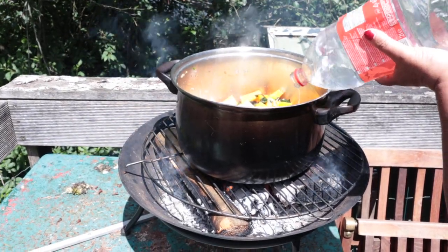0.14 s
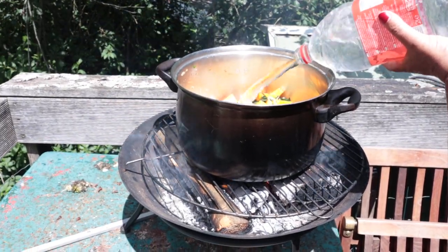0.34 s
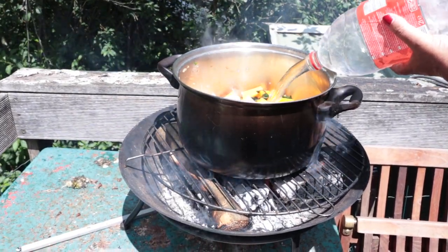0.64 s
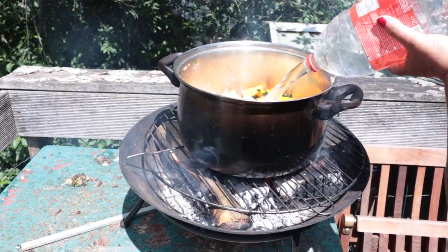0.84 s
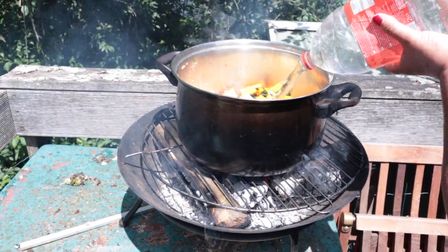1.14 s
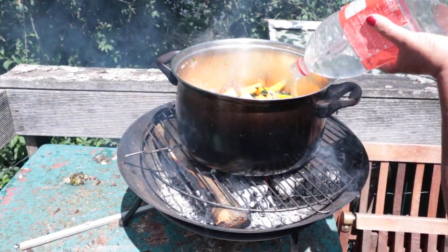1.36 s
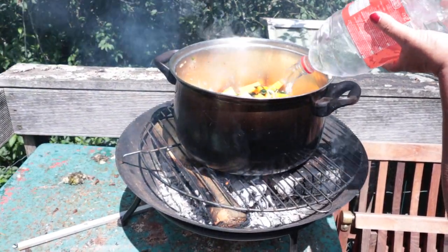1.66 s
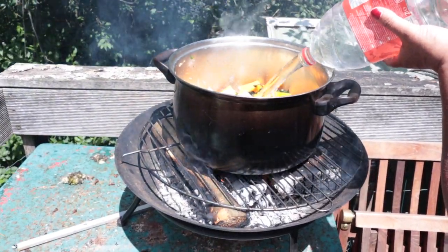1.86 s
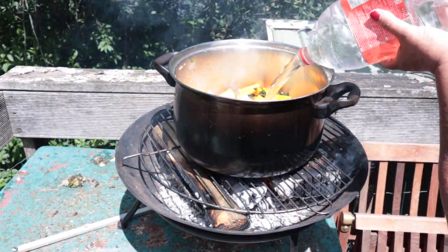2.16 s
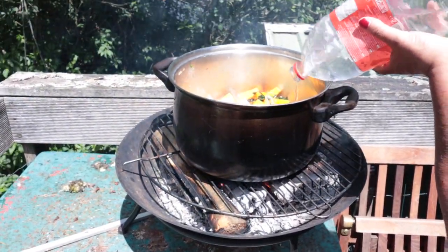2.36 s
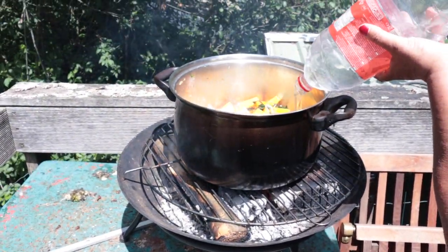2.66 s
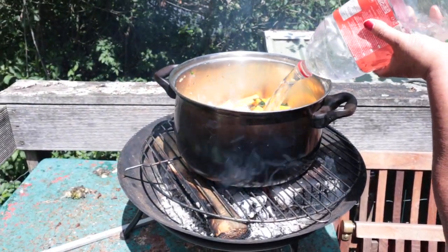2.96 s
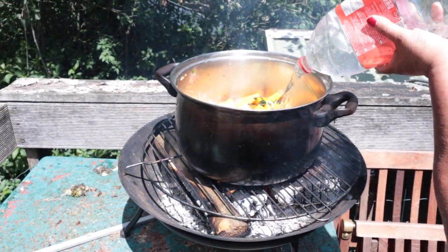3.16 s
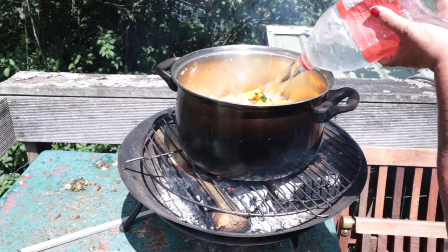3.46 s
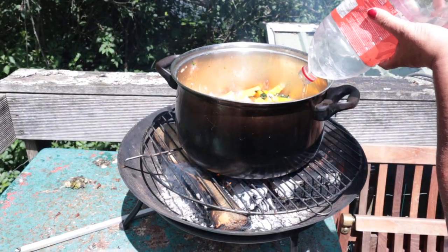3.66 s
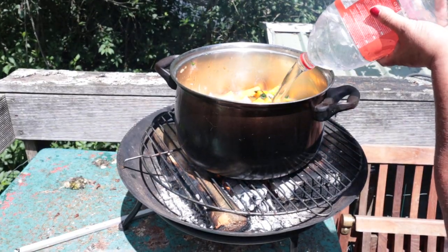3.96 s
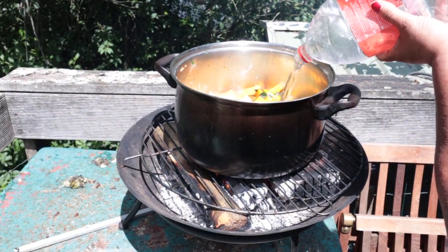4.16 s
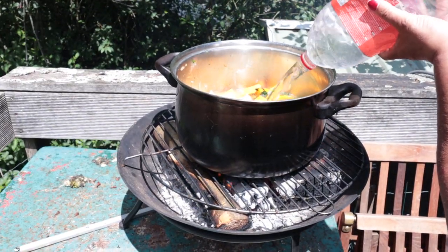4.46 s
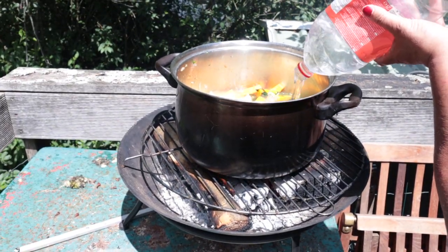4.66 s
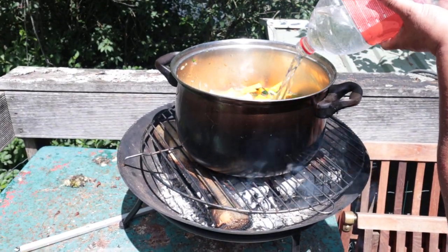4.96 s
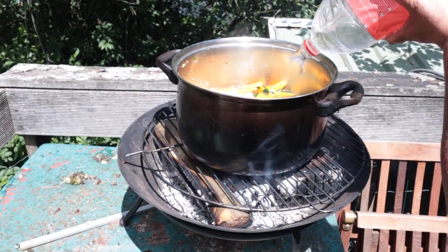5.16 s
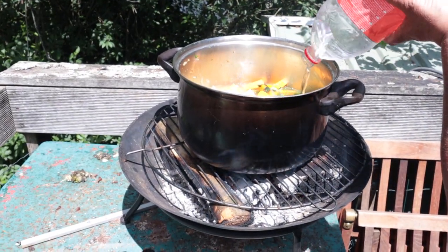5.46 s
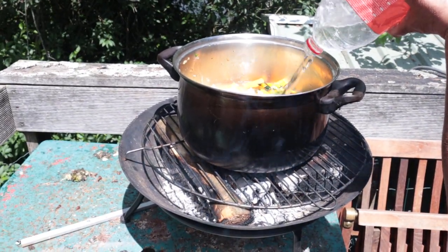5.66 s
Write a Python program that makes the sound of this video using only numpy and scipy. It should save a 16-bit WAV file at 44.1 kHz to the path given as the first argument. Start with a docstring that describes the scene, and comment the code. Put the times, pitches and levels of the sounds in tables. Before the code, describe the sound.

A stereo microphone near a pot on a terrace catches fierce frying hiss with sharp fat spits as water lands. Within about three seconds the hiss thins into separate fizzing bubbles, splashes and bright drips. The bottle, slightly to the right, gulps air with round low plops and snaps its thin walls in and out. A faint breeze rumbles, with a few soft gust thuds past the middle.

```python
"""Fat sizzles fiercely in a hot metal pot as water is poured in from a thin plastic bottle, gulping air.
The sizzle is noise cut into random bubble bursts and coloured by the pot; as the pot is quenched it thins to
a splashing trickle of ringing bubbles. The gulps are sinking rings with thumps, the pops of the bottle's walls
add snaps and clatter, spits are fading noise cracks and drips are rising tones.
A light breeze and gusts on the microphone are low, lumpy noise with single eddies."""
import sys
import numpy as np
from scipy import signal
from scipy.fft import rfft, irfft, next_fast_len
from scipy.io import wavfile

SR = 44100
rng = np.random.default_rng(int(sys.argv[2]) if len(sys.argv) > 2 else 0)


def materialize(psi):
    """Save the field psi as 16-bit PCM at rate SR to the path in sys.argv[1].

    A 1-D psi becomes a single channel; in a 2-D psi each row is a channel.
    """
    bounded = np.clip(np.atleast_2d(psi).T, -1, 1)
    quanta = np.round(bounded * 32767).astype(np.int16)
    wavfile.write(sys.argv[1], SR, quanta)


N = 256220

# the jet swells and thins as the bottle empties: (time [s], flow [dB], extra fine spray [dB])
JET = [(0.0, -6, 10), (0.18, 1.0, -1), (0.46, -1.5, 0), (0.72, -3.5, -2), (0.87, 0.5, 4.5),
       (1.14, -0.5, -1), (1.26, 2.5, 4), (1.68, -5, 2), (2.16, 4, -1), (2.36, 2, -3), (2.48, 3.5, -0.5),
       (2.6, -4, 1), (2.77, 0, -4.5), (3.0, 7, -1.5), (3.08, 6.5, -6.5), (3.19, 8, -4), (3.26, -4.5, 3),
       (3.38, -4.5, -2.5), (3.55, -7.5, -4), (3.72, 1, 2), (3.86, 0.5, 2.5), (4.14, -5, 5), (4.32, 2, 1),
       (4.47, -3, -5), (4.8, 2.5, 2), (5.2, 4, -1.5), (5.34, -1.5, -4), (5.52, 5.5, 0), (5.68, -5, 0),
       (5.81, 5.5, -2)]
# the jet moves between hot metal and food: (time [s], rise of the sizzle's upper half, fall of its lower half [dB])
# one value serves both
BRIGHTNESS = [(0, -1.5), (.55, 1.5), (.95, -0.5), (1.15, 2), (1.32, 3), (1.6, -1.5), (1.9, 0.5), (2.15, 4),
              (2.5, -0.1), (3.3, 2.5), (4.4, -1.5), (5.0, -3), (5.8, -3)]
# finest spray against the rest: (time [s], rise above 9.7 kHz and equal fall below it [dB])
SPRAY_TILT = [(0, 1.5), (.5, -0.24), (.9, -0.36), (1.4, -0.11), (1.8, 0.14), (2.15, 1.8), (2.5, 1.5),
              (3.2, 1.2), (3.6, -0.87), (4.2, 1.5), (5.0, 1.2), (5.8, .5)]
# air resonances and notches of the pot: (settled pitch [Hz], width [Hz], gain at depth 1 [dB])
POT_MODES = [(710, 50, 2), (1020, 160, 6.5), (1412, 65, 8.5), (1555, 105, -19.5), (1850, 44, 9.5),
             (1930, 170, 1.5), (2304, 92, 6.5), (3110, 80, 1.5), (4260, 230, 2.5), (4720, 190, 2.5),
             (5070, 170, -4.5), (6670, 150, 2), (11220, 1600, 3.5)]
# noise colours, of which only the shape counts: (frequency [Hz], relative level [dB])
SPLASH_COLOUR = [(60, -2), (120, 4), (200, 1.5), (400, 5), (650, 8.5), (860, 3.5), (1050, 2), (1400, -4),
                 (2000, -30), (4000, -40)]
SIZZLE_COLOUR = [(500, -13), (1200, -7), (1800, -4.5), (2300, -0.5), (3000, -1.5), (3700, 3), (4600, 0),
                 (5400, -1.5), (7000, -6.5), (11000, -25), (16000, -50)]
SPRAY_COLOUR = [(2000, 1), (4500, -3), (6500, -1), (8500, 0.5), (11700, 3), (12800, 0), (14000, -8),
                (16000, -17.5)]
GUST_COLOUR = [(15, -29), (30, -25), (52, 0), (80, -9), (130, -9), (300, -22), (1000, -64.5)]
# stereo of the noises: (frequency [Hz], left-right likeness, clipped to 0-1 [ratio])
LIKENESS = [(100, 1.24), (600, 0.73), (1400, 0.84), (3100, 0.43), (7000, 0.23), (14000, -0.07)]
# (frequency [Hz], left minus right [dB])
BALANCE = [(150, 1), (400, 0), (1300, -3), (2400, -4.5), (4400, -3), (8000, 1.5), (15000, -1)]
# band edges for bubbles of different sizes: (frequency [Hz])
SIZZLE_EDGES = [300, 2300, 3700, 14000]
SPRAY_EDGES = [1800, 6500, 9800, 18000]
# gusts of wind: (start [s], hold [s], level [dB])
GUSTS = [(0, 1.7, -49), (1.751, .65, -44), (2.6, .45, -47.5), (3.36, 0.095, -34.5), (3.72, 0.31, -36.5),
         (4.08, 0.061, -31), (4.3, 0.063, -41), (4.54, 0.033, -41.5), (5.15, 0.082, -42),
         (5.36, 0.095, -46.5), (5.71, .08, -42)]
# eddies that hit the microphone: (time [s], level [dB], pitch [Hz])
BUFFETS = [(3.528, -16.5, 132), (3.795, -18, 91), (4.14, -19, 125), (4.165, -15, 77), (4.275, -22, 226),
           (4.337, -10.5, 172), (4.592, -23.5, 153)]
# the bottle gulps air with a round plop; pitches are nominal, levels are rms over 25 ms:
# (time [s], ring [Hz], ring level [dB], ring t60 [s], thump [Hz], thump level [dB])
GULPS = [(.012, 440, -45.5, 0.017, 192, -39), (.221, 680, -31, 0.064, 286, -41),
         (.253, 417, -24.5, 0.068, 188, -43), (.259, 650, -36, .04, 290, -47),
         (0.492, 583, -34, 0.05, 365, -34), (0.509, 724, -37, 0.04, 184, -32.5),
         (.745, 617, -39, .05, 300, -51), (0.976, 660, -33.5, 0.018, 156, -38),
         (1.165, 655, -38, 0.036, 300, -53), (1.081, 664, -28, 0.036, 157, -28.5),
         (1.419, 421, -26, 0.055, 149, -35), (1.456, 413, -35, 0.061, 158, -36),
         (1.854, 552, -35.5, 0.059, 289, -37), (1.882, 340, -62, .04, 169, -53),
         (1.936, 330, -56, .04, 177, -41), (2.05, 318, -41, 0.044, 188, -44),
         (2.131, 520, -26, 0.055, 323, -27), (2.14, 400, -33, .05, 138, -33.5),
         (2.157, 780, -28.5, 0.024, 338, -26), (2.337, 625, -35, 0.017, 200, -59),
         (2.353, 590, -40.5, 0.015, 200, -60), (2.421, 567, -22, 0.032, 310, -27),
         (2.665, 660, -31.5, .04, 175, -38.5), (2.763, 705, -31.5, 0.012, 191, -37),
         (2.785, 322, -38, 0.06, 180, -46), (3.452, 415, -43, .07, 199, -50),
         (3.828, 734, -40.5, 0.024, 190, -64), (3.925, 400, -49, 0.027, 152, -48),
         (4.136, 327, -38, 0.059, 200, -42), (4.199, 350, -38.5, 0.072, 202, -35.5),
         (4.217, 546, -46, 0.045, 260, -39), (4.25, 645, -40, 0.031, 205, -39),
         (4.268, 370, -40, 0.038, 220, -41), (4.415, 430, -35.5, 0.027, 194, -38),
         (4.754, 680, -30.5, 0.012, 200, -67), (4.92, 666, -35.5, 0.019, 307, -40),
         (5.163, 450, -30.5, 0.05, 290, -34.5), (5.188, 416.4, -22, 0.14, 325, -29.5),
         (5.2, 570, -31, .04, 330, -32.5), (5.236, 440, -35, 0.049, 202, -38),
         (5.393, 664, -41.5, 0.014, 298, -37), (5.535, 317, -24, 0.042, 193, -27),
         (5.568, 630, -30.5, 0.02, 200, -57), (5.803, 576, -33, 0.026, 196, -57)]
# a wall of the bottle jumps in or out: (time [s], snap level [dB], snap edge [Hz], crease [Hz],
# crease level [dB], ring [Hz], ring level [dB], thump [Hz], thump level [dB])
POPS = [(2.484, -28.5, 3484, 4260, -23, 517, -23, 170, -27),
        (2.625, -28, 1520, 4500, -44, 1284, -39, 672, -35.5),
        (3.015, -26.5, 1180, 4500, -55, 740, -20, 235, -19.5),
        (3.054, -19.5, 1560, 4500, -50, 1020, -25, 188, -24),
        (3.4314, -21, 2420, 4670, -24.5, 1144, -26, 600, -25),
        (3.751, -32.5, 3680, 4120, -33, 710, -39, 153, -30.5),
        (3.987, -20, 2120, 6100, -30.5, 796, -25, 254, -27.5),
        (4.363, -17, 4300, 4950, -21, 1050, -27.5, 341, -26),
        (5.0505, -22, 5600, 5250, -27.5, 623, -31, 293, -43),
        (5.186, -21, 3030, 5500, -31, 737, -24, 179, -29.5),
        (5.217, -26, 2260, 4000, -37, 686, -24.5, 302, -25.5),
        (5.53, -28.5, 3230, 4000, -47, 660, -27, 224, -37)]
# the loudest spits of hot fat, before the pot: (time [s], level [dB], centre [Hz], t60 [s])
SPITS = [(.349, -21, 2800, .012), (.373, -25, 3300, 0.0073), (.562, -13, 3280, 0.013),
         (.621, -15.5, 2320, 0.017), (.699, -15.5, 4900, 0.015), (1.499, -19, 10300, 0.0072),
         (.941, -18, 2530, 0.039), (1.586, -20, 6300, 0.011), (2.137, -16, 3900, 0.034),
         (3.003, -23.5, 8300, 0.14), (3.419, -22.5, 6600, 0.033), (3.489, -21.5, 6650, 0.009),
         (3.54, -32.5, 6800, 0.039), (3.615, -20.5, 6370, 0.053), (3.466, -30, 6500, 0.013),
         (3.754, -23, 4080, 0.025), (4.191, -11, 7140, 0.003), (4.207, -15, 11400, 0.004),
         (4.326, -23, 11400, 0.0088), (4.481, -31, 4250, 0.026), (4.558, -30, 6000, 0.036),
         (4.676, -26, 5500, 0.05), (5.149, -26, 5000, 0.043), (5.357, -34, 5900, 0.037),
         (5.463, -31, 4600, 0.083), (5.602, -32, 3300, 0.031)]
# the loudest bubbles trapped by falling drops: (time [s], level [dB], starting pitch [Hz], t60 [s])
DRIPS = [(.699, -12, 4620, 0.027), (2.793, -24, 2300, .015), (2.821, -22, 4630, 0.02),
         (2.889, -27, 1860, 0.024), (2.981, -23, 2300, 0.022), (3.154, -19, 2040, 0.033),
         (3.178, -18.5, 4790, 0.02), (3.188, -23, 1800, .025), (3.266, -25, 3920, .02),
         (3.542, -18, 7400, 0.016), (3.721, -31, 1654, 0.089), (3.959, -26, 1320, 0.028),
         (4.266, -26, 1730, 0.03), (4.33, -26, 3570, 0.021), (4.699, -19, 2600, 0.022),
         (4.701, -19, 3300, .022), (4.738, -31, 1820, 0.012), (4.781, -28, 2800, 0.096),
         (4.95, -22.5, 1930, .025), (4.966, -24, 2800, .025), (5.058, -23, 2320, 0.027),
         (5.386, -28, 1676, 0.078), (5.448, -26, 1660, 0.11), (5.658, -38, 1900, 0.12),
         (5.765, -14.5, 2000, 0.02), (5.787, -18, 3240, 0.015)]
# slugs of water that fold in bubbles: (time [s], length [s], middle bubble level [dB], centre pitch [Hz])
SPLASHES = [(3.148, .055, -31, 3270), (3.673, .07, -34.5, 2600), (4.0, 0.017, -27, 3720),
            (4.651, 0.031, -31, 3040), (4.674, 0.014, -21.5, 3870), (4.941, 0.025, -36, 2600),
            (5.224, .025, -31, 3800), (5.434, 0.046, -31, 2940), (5.544, .028, -29, 3290)]

# the water quenches the pot: its heat falls from 1 to 0 along an S-curve
QUENCH_S, QUENCH_WIDTH_S = 2.28, 0.71
# level at 0 dB flow in the quenched pot, and what full heat adds
SPLASH_DB, SPLASH_HEAT_DB = -47.5, 8.5
SIZZLE_DB, SIZZLE_HEAT_DB = -46.5, 23
SPRAY_DB, SPRAY_HEAT_DB = -41, 16
SPLASH_FOLLOWS = 0.36   # share of the flow's swing that the splash takes
# bursting bubbles, and their share of smooth hiss (0-1), in the quenched and in the hot pot
COOL_BURSTS_PER_S, HOT_BURSTS_PER_S = 520, 4500
COOL_SMOOTH, HOT_SMOOTH = 0.26, 0.75
SPRAY_SPREAD_DB, JET_FLUTTER_DB = 4.6, 1.8
SHIMMER_DB, SHIMMER_RATE_HZ = 2, 2.9   # the colour of the spray wanders as the jet moves about
# steam rushes off the metal as the first water lands, then dies away
STEAM_HZ, STEAM_WIDTH_HZ, STEAM_DB, STEAM_T60_S = 2800, 410, 8, 2.8
# steam drives the air out of the pot: its resonances start flat by this share of their pitch and rise
POT_FLAT, POT_RISE_S = 0.047, 1   # the rise is a time constant
BREEZE_DB, GUST_ATTACK_S, GUST_T60_S = -53.5, 0.049, 1
# a gulp hardly stirs the wall: its snap is set relative to its ring
GULP_SNAP_DB, GULP_EDGE_HZ, GULP_SOFTNESS = -11.5, 1630, 0.51
POP_RING_T60_S, POP_SOFTNESS = 0.028, 0.12   # a pop rings briefly and starts hard
THUMP_T60_S, THUMP_RISE_S = 0.05, 0.0023   # the air in the bottle thumps just after each gulp or pop
HUM_HZ, HUM_DB, HUM_T60_S = 189.4, -12.5, 0.21   # and hums on in its lowest mode, relative to the thump
# smaller bubbles break off behind each gulp or pop, relative to its ring
TRAIL_DB, TRAIL_S, TRAIL_HZ, TRAIL_T60_S = -15.5, 0.057, 750, 0.019
# the wall gives way in a few quick slips, each weaker than the last, and its modes clatter with them
SLIP_GAP_S, SLIP_LOSS_DB, SNAP_LOW_HZ, CLATTER_DB = 0.00122, 3.5, 880, -0.5
CREASE_WIDTH_HZ, CREASE_T60_S = 360, 0.021   # the crease rings as it runs through the plastic; half width
# small spits come at random, around these middle values
SMALL_SPITS_PER_S, SMALL_SPIT_DB, SMALL_SPIT_SPREAD_DB = 5.2, -35, 6.0
SMALL_SPIT_HZ, SMALL_SPIT_T60_S = 6800, 0.011
# once the hiss has died down, droplets come at random, louder where the jet is fuller
SMALL_DRIPS_FROM_S, SMALL_DRIPS_PER_S = 2.7, 77
SMALL_DRIP_DB, SMALL_DRIP_HZ, SMALL_DRIP_CYCLES = -40, 2600, 48
SPLASH_BUBBLES_PER_S, SPLASH_OCTAVES, SPLASH_CYCLES = 640, 1.33, 58
CUTOFF_HZ = 16000
SIDES = np.array([[1], [-1]])   # left and right


def from_db(db):
    """Decibels to gain."""
    return 10 ** (np.asarray(db) / 20)


def rms_one(x):
    """Scale to rms 1."""
    return x / np.sqrt(np.mean(x ** 2) + 1e-20)


def in_time(rows):
    """Each column of a curve, sample by sample."""
    s, *columns = np.transpose(rows)
    return [np.interp(np.arange(N) / SR, s, c) for c in columns]


def at_hz(points, hz):
    """Read a table on a log-frequency axis."""
    at, value = np.transpose(points)
    return np.interp(np.log(hz + 1), np.log(at), value)


def drift(rate):
    """Slow random wander with spread 1: noise through two poles at this rate in Hz."""
    # made at a fortieth of the sample rate; the first 2000 points let the filter settle
    r = np.exp(-80 * np.pi * rate / SR)
    noise = rng.standard_normal(N // 40 + 2002)
    slow = signal.lfilter([1], [1, -2 * r, r * r], noise)[2000:]
    return np.interp(np.arange(N) / 40, np.arange(len(slow)), rms_one(slow))


def filtered(x, hz, kind, order=2):
    """Causal Butterworth filter."""
    sos = signal.butter(order, np.clip(hz, 10, .47 * SR), kind, fs=SR, output="sos")
    return signal.sosfilt(sos, x)


def resonance(x, hz, width_hz):
    """One resonance with gain 1 on top."""
    r = np.exp(-np.pi * width_hz / SR)
    top = np.array([1, 0, -1]) * (1 - r * r) / 2
    return signal.lfilter(top, [1, -2 * r * np.cos(2 * np.pi * hz / SR), r * r], x)


def fade(t, t60):
    """Exponential decay by 60 dB in t60 seconds."""
    return np.exp(-np.log(1000) * t / t60)


def add(out, s, sound):
    """Mix a short sound in at time s."""
    i = max(round(s * SR), 0)
    out[..., i:i + sound.shape[-1]] += sound[..., :N - i]


def coloured(pair, spectrum):
    """Two unrelated noises become stereo with this spectrum, alike in the bass and less so in the treble."""
    size = next_fast_len(N)
    hz = np.arange(size // 2 + 1) * SR / size
    mid, side = rfft(pair, size) * from_db(at_hz(spectrum, hz))
    alike = np.clip(at_hz(LIKENESS, hz), 0, 1)
    both = np.sqrt(1 + alike) * mid + SIDES * np.sqrt(1 - alike) * side
    both = both * from_db(SIDES * at_hz(BALANCE, hz) / 2)
    return irfft(both, size)[:, :N]


def grains(per_s, smooth, spread_db, life_s):
    """Tiny bubbles burst at random, each a short crack of its own size, over a smooth hiss."""
    sizes = from_db(spread_db * np.minimum(rng.exponential(1, N), 4.5)) * (rng.random(N) < per_s / SR)
    power = signal.lfilter([1], [1, -np.exp(-2 / (life_s * SR))], sizes ** 2 + 1e-18) / per_s
    smooth = np.clip(smooth, 0, 1)
    return np.sqrt(smooth + (1 - smooth) * power / power.mean()) * rng.standard_normal((2, N))


def fizz(edges_hz, per_s, smooth, spread_db, life_s, flutter_db):
    """Bubbles of each size burst in a band of their own, and each size comes in its own flurries."""
    total = 0
    for band in zip(edges_hz, edges_hz[1:]):
        bursts = filtered(grains(per_s, smooth, spread_db, life_s), band, "band")
        total = total + bursts * from_db(flutter_db * (1 - smooth) * drift(39.0))
    return total


def pot(x, depth=1.0, size=2048):
    """The open pot stamps its resonances and notches on whatever sounds inside; they rise as it fills with steam."""
    out = x + 1e-18
    for hz, width_hz, db in POT_MODES:
        r, state = np.exp(-np.pi * width_hz / SR), np.zeros((2, 2))
        top = (from_db(depth * db) - 1) * np.array([1, 0, -1]) * (1 - r * r) / 2
        for i in range(0, N, size):   # the pitch moves block by block
            now_hz = hz * (1 - POT_FLAT * np.exp(-i / SR / POT_RISE_S))
            poles = [1, -2 * r * np.cos(2 * np.pi * now_hz / SR), r * r]
            ring, state = signal.lfilter(top, poles, out[:, i:i + size], zi=state)
            out[:, i:i + size] += ring
    return out


def between_walls(x, echo_db=-5.0, t60=0.023, count=40):
    """Sound bounces about inside the metal pot, which combs its spectrum into fine stripes."""
    t = np.arange(round(.04 * SR)) / SR
    echoes = np.zeros(len(t))
    echoes[rng.integers(0, len(t), count)] = rng.choice([-1, 1], count)
    echoes = echoes * fade(t, t60)
    echoes = echoes[None] / np.linalg.norm(echoes)
    return rms_one(x + from_db(echo_db) * signal.fftconvolve(x, echoes, axes=1)[:, :N])


def wandering(x, edges_hz):
    """Each band between these edges swells and sinks slowly on its own."""
    out = 0
    for hz in edges_hz:
        low = filtered(x, hz, "low", order=1)
        out, x = out + low * from_db(SHIMMER_DB * drift(SHIMMER_RATE_HZ)), x - low
    return out + x * from_db(SHIMMER_DB * drift(SHIMMER_RATE_HZ))


def tilted(x, hz, order_db):
    """Lift the part above hz by a moving level and lower the part below it by as much."""
    lower, upper = (filtered(x, hz, kind, order=3) for kind in ("low", "high"))
    return lower * from_db(-order_db) + upper * from_db(order_db)


def bubbles(per_s, spread_db, cycles, low_hz, high_hz, count=30):
    """The jet folds air into the water in bunches; bubbles ring for some cycles at many pitches and places."""
    sizes = from_db(spread_db * np.minimum(rng.exponential(1, N), 3)) * rng.choice([-1, 1], N)
    born = rng.random(N) < per_s * from_db(4 * drift(12)) / SR
    dealt = rng.integers(0, count, N)   # which pitch each bubble takes
    pans = from_db(rng.normal(0.15, 4.6, (count, 1, 1)) * SIDES)
    total = 0
    for k, hz in enumerate(np.geomspace(low_hz, high_hz, count)):
        ring = resonance(sizes * born * (dealt == k) + 1e-18, hz, hz / cycles)
        total = total + pans[k] * ring / hz ** 0.25
    return rms_one(total)


def frying_water():
    """Low splash and big bubbles, middle sizzle, foam and small bubbles, high spray follow jet and heat."""
    t = np.arange(N) / SR
    flow_db, extra_spray_db = in_time(JET)
    bright_db, = in_time(BRIGHTNESS)
    tilt_db, = in_time(SPRAY_TILT)
    heat = 1 / (1 + np.exp((t - QUENCH_S) / QUENCH_WIDTH_S))
    splash_db = SPLASH_DB + SPLASH_HEAT_DB * heat + SPLASH_FOLLOWS * flow_db
    sizzle_db = SIZZLE_DB + SIZZLE_HEAT_DB * heat + flow_db
    spray_db = SPRAY_DB + SPRAY_HEAT_DB * heat + flow_db + extra_spray_db
    per_s = COOL_BURSTS_PER_S * (HOT_BURSTS_PER_S / COOL_BURSTS_PER_S) ** heat
    smooth = COOL_SMOOTH + (HOT_SMOOTH - COOL_SMOOTH) * heat ** 2
    flutter = drift(28.6) * (1 - smooth)

    splash = coloured(grains(per_s / 4, smooth, spread_db=0.5, life_s=0.005), SPLASH_COLOUR)
    splash = rms_one(pot(splash, depth=0.44))

    sizzle = fizz(SIZZLE_EDGES, per_s, smooth, spread_db=4.0, life_s=0.0017, flutter_db=3.5)
    sizzle = between_walls(pot(coloured(sizzle, SIZZLE_COLOUR), depth=1.1), echo_db=-6.5)
    sizzle = tilted(sizzle, 3330, bright_db)
    steam = fade(t, STEAM_T60_S) * resonance(sizzle, STEAM_HZ, STEAM_WIDTH_HZ)
    sizzle = sizzle + from_db(STEAM_DB) * steam

    spray = fizz(SPRAY_EDGES, per_s, smooth, SPRAY_SPREAD_DB, life_s=0.00094, flutter_db=4.0)
    spray = between_walls(pot(coloured(spray, SPRAY_COLOUR), depth=0.72), echo_db=-9.0)
    spray = wandering(tilted(spray, 9700, tilt_db), [7000, 11000])

    big = bubbles(per_s=82, spread_db=6.5, cycles=17, low_hz=470, high_hz=2000)
    small = bubbles(per_s / 7, spread_db=5.5, cycles=130, low_hz=1894, high_hz=5000)
    foam = bubbles(per_s=650, spread_db=5.5, cycles=28, low_hz=1501, high_hz=5760)
    foam = rms_one(pot(foam, depth=0.87))
    wetness_db = -14 * smooth   # single bubbles stand out once the hiss dies down
    return (from_db(splash_db + 4.9 * flutter) * splash
            + from_db(splash_db - 4.0) * big
            + from_db(sizzle_db + JET_FLUTTER_DB * flutter) * sizzle
            + from_db(sizzle_db + wetness_db - 2.5) * small
            + from_db(sizzle_db + wetness_db + 0.5) * foam
            + from_db(spray_db + JET_FLUTTER_DB * flutter) * spray)


def wind(lumpy_db=4.0, own_db=-11):
    """Lumpy rumble swells in gusts, partly opposed left and right; single eddies push and pull once."""
    t = np.arange(N) / SR
    strength = from_db(BREEZE_DB)
    for s, hold_s, db in GUSTS:
        attack = np.clip((t - s) / GUST_ATTACK_S, 0, 1)
        release = fade(np.maximum(t - s - GUST_ATTACK_S - hold_s, 0), GUST_T60_S)
        strength = np.maximum(strength, from_db(db) * attack * release)
    shared, other = (rms_one(coloured(pair, GUST_COLOUR)) for pair in rng.standard_normal((2, 2, N)))
    rumble = shared + from_db(own_db) * other * SIDES
    out = strength * from_db(lumpy_db * drift(12.6)) * rumble
    for s, db, hz in BUFFETS:
        turns = (t - s) * hz
        out = out + from_db(db) * np.sin(2 * np.pi * turns) * np.exp(-np.minimum((turns / 0.5) ** 2, 50))
    return out


def from_the_right(x, pan_db, lag_s):
    """A source on the right reaches the left ear later and weaker."""
    at = np.arange(N)
    return np.array([from_db(-pan_db) * np.interp(at - lag_s * SR, at, x), from_db(pan_db) * x])


def bottle(wall_t60=0.015, snap_t60=0.024, slosh_t60=0.037, soft_attack_s=0.0032, sag=0.2, count=26):
    """A soft gulp of air is a round plop; a hard one makes the wall jump, with a snap and a clatter of wall modes."""
    out, t = np.zeros(N), np.arange(round(.18 * SR)) / SR
    window = .025 * SR

    def at_level(x, db):
        """Scale a blow to its rms level over 25 ms."""
        return from_db(db) * x * np.sqrt(window / np.sum(x ** 2))

    def modes(low_hz, high_hz, t60, chance, tilt):
        """Closely spaced wall modes, different for every dent; high ones die sooner."""
        hz = low_hz * (high_hz / low_hz) ** ((np.arange(count) + chance[0]) / count)
        strength = (0.058 + chance[1]) * np.sign(chance[2] - .5) * (hz / low_hz) ** tilt
        brief = t[:len(t) // 4]
        rings = np.sin(2 * np.pi * hz[:, None] * brief) * fade(brief, t60 * np.sqrt(low_hz / hz)[:, None])
        return np.pad(strength @ rings, (0, len(t) - len(brief)))

    def sinking(hz, t60):
        """A ring whose pitch sinks as the gulped bubble grows."""
        pitch = hz * (1 + sag * (np.exp(-t / 0.0067) - .4))
        return np.sin(2 * np.pi * np.cumsum(pitch) / SR) * fade(t, t60)

    def trail(count=5):
        """A few small bubbles, one after another, each at a pitch of its own."""
        when, pitch = rng.random((2, count, 1))
        age = np.maximum(t - TRAIL_S * when, 0)
        rings = np.sin(2 * np.pi * TRAIL_HZ * 2 ** (2 * pitch - 1) * age) * fade(age, TRAIL_T60_S)
        return np.sum(rings * np.exp(-when), axis=0)

    def slips(count=4):
        """The clicks of a dent giving way, unevenly spaced."""
        clicks, gaps = np.zeros(len(t)), SLIP_GAP_S * (.5 + rng.random(count))
        clicks[((np.cumsum(gaps) - gaps[0]) * SR).astype(int)] = from_db(-SLIP_LOSS_DB * np.arange(count))
        return clicks

    def blow(ring_hz, ring_db, ring_t60, thump_hz, thump_db, edge_hz, snap_db, crease_hz, crease_db, softness):
        """One gulp or pop: the bubble rings, the air thumps and hums, the water sloshes, the wall clatters and snaps."""
        dent, noise = rng.random((6, count)), rng.standard_normal(len(t))
        swell, late = 1 - np.exp(-t / (soft_attack_s * softness)), 1 - np.exp(-t / 0.012)
        ring = sinking(ring_hz, ring_t60) * swell
        thump = -sinking(thump_hz, THUMP_T60_S) * (1 - np.exp(-t / THUMP_RISE_S))
        hum = np.sin(2 * np.pi * HUM_HZ * t) * fade(t, HUM_T60_S) * late
        wall = modes(311.0, 1140, wall_t60, dent[:3], tilt=0.52) * swell
        clatter = at_level(modes(995, edge_hz * 1.416, snap_t60, dent[3:], tilt=0.56), CLATTER_DB)
        crack = filtered(filtered(slips(), SNAP_LOW_HZ, "high"), edge_hz, "low", order=1)
        snap = filtered(at_level(crack, 0) + clatter, edge_hz * 1.22, "low", order=4)
        slosh = filtered(noise, [120, 650], "band") * fade(t, slosh_t60) * late
        crease_band = [crease_hz - CREASE_WIDTH_HZ, crease_hz + CREASE_WIDTH_HZ]
        crease = filtered(noise * fade(t, CREASE_T60_S), crease_band, "band")
        return (at_level(ring, ring_db) + at_level(thump, thump_db)
                + at_level(hum, thump_db + HUM_DB) + at_level(slosh, thump_db - 2.5)
                + at_level(trail(), ring_db + TRAIL_DB) + at_level(crease, crease_db)
                + at_level(wall, ring_db - 6 - 7 * softness) + at_level(snap, snap_db))

    for s, ring_hz, ring_db, ring_t60, thump_hz, thump_db in GULPS:
        add(out, s, blow(ring_hz, ring_db, ring_t60, thump_hz, thump_db, GULP_EDGE_HZ,
                         ring_db + GULP_SNAP_DB, 4400, ring_db - 28, GULP_SOFTNESS))
    for s, snap_db, edge_hz, crease_hz, crease_db, ring_hz, ring_db, thump_hz, thump_db in POPS:
        add(out, s, blow(ring_hz, ring_db, POP_RING_T60_S, thump_hz, thump_db, edge_hz,
                         snap_db, crease_hz, crease_db, POP_SOFTNESS))
    return from_the_right(filtered(out, 73, "high"), pan_db=1.2, lag_s=.00007)


def spits(width=1.6, skirt_db=-12.0):
    """A drop flashes to steam: a sharp crack that trails off as a hiss."""
    out, t = np.zeros((2, N)), np.arange(round(.2 * SR)) / SR
    rows = list(SPITS)
    for when, size, pitch, length in rng.random((round(SMALL_SPITS_PER_S * N / SR), 4)):
        db = SMALL_SPIT_DB + SMALL_SPIT_SPREAD_DB * (2 * size - 1)
        hz = SMALL_SPIT_HZ * 2 ** (2 * pitch - 1)   # up to an octave either way
        rows.append((when * N / SR, db, hz, SMALL_SPIT_T60_S * (.5 + length)))
    for (s, db, hz, t60), (mid, side) in zip(rows, rng.standard_normal((len(rows), 2, len(t)))):
        noise = mid + 0.8 * side * SIDES
        core = rms_one(filtered(noise, [hz / width, hz * width], "band"))
        steam = core + from_db(skirt_db) * filtered(noise, 900, "high")
        add(out, s, from_db(db) * steam * fade(t, t60))
    return pot(out, depth=0.77)


def clusters(spread_db=12):
    """Each slug of water lands and folds in bubbles: rows of (time [s], level [dB], pitch [Hz], t60 [s])."""
    rows = []
    for (s, length_s, db, centre_hz), chance in zip(SPLASHES, rng.random((len(SPLASHES), 64, 3))):
        when, size, pitch = chance[:max(round(SPLASH_BUBBLES_PER_S * length_s), 1)].T
        hz = centre_hz * 2 ** (SPLASH_OCTAVES * (pitch - .5))
        rows += zip(s + when * length_s, db + spread_db * (size - .5), hz, SPLASH_CYCLES / hz)
    return rows


def drips(rise=0.146, follows=0.65, spread_db=12):
    """Each drop traps a bubble in a place of its own; it rings and rises in pitch as it nears the surface."""
    out, t = np.zeros((2, N)), np.arange(round(.1 * SR)) / SR
    span_s = N / SR - SMALL_DRIPS_FROM_S
    when, size, pitch = rng.random((round(SMALL_DRIPS_PER_S * span_s), 3)).T
    times, pitches = SMALL_DRIPS_FROM_S + when * span_s, SMALL_DRIP_HZ * 2 ** (2 * pitch - 1)
    flow_db = np.interp(times, *np.transpose(JET)[:2])
    levels_db = SMALL_DRIP_DB + spread_db * (size - .5) + follows * flow_db
    small = zip(times, levels_db, pitches, SMALL_DRIP_CYCLES / pitches)
    for s, db, hz, t60 in [*DRIPS, *clusters(), *small]:
        place = rng.normal(0, 0.78) * SIDES   # phase shift between left and right
        phase = 2 * np.pi * hz * (t + rise * t * t / (2 * t60)) + place
        add(out, s, from_db(db) * np.sin(phase) * fade(t, t60) * (1 - np.exp(-t / 0.00031)))
    return out


def terrace(x, wet_db=-9.5, t60=0.074, dull_hz=2200):
    """Pot, table and railing scatter a short, dull tail."""
    t = np.arange(round(.25 * SR)) / SR
    mid, side = rng.standard_normal((2, len(t)))
    scatter = (mid + 0.084 * side * SIDES) * fade(t, t60) * (t > .003)
    tail = filtered(scatter, dull_hz, "low", order=1)
    tail = tail / np.sqrt(np.sum(fade(t, t60) ** 2))
    return x + from_db(wet_db) * signal.fftconvolve(x, tail, axes=1)[:, :N]


def scene():
    """The pot and the bottle on the terrace, and the wind."""
    return frying_water() + terrace(bottle() + spits() + drips()) + wind()


def record(dry):
    """Anything beyond full scale clips; a steep low-pass cuts the top."""
    low_pass = signal.ellip(10, .1, 80, CUTOFF_HZ, fs=SR, output="sos")
    return signal.sosfilt(low_pass, np.clip(dry, -1, 1))


dry = scene()
out = record(dry)
materialize(out)
```